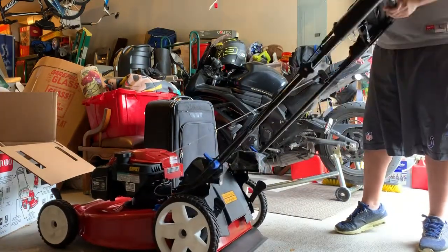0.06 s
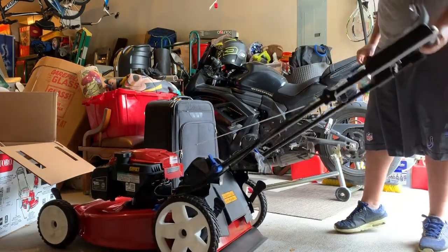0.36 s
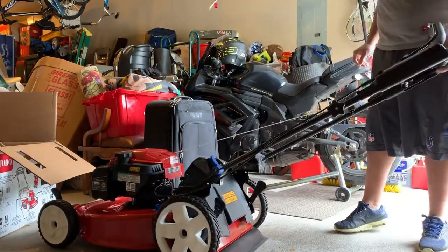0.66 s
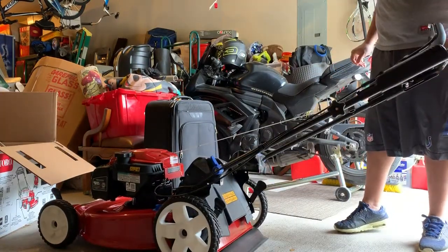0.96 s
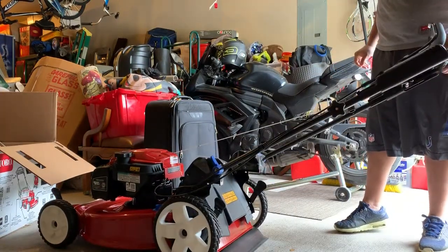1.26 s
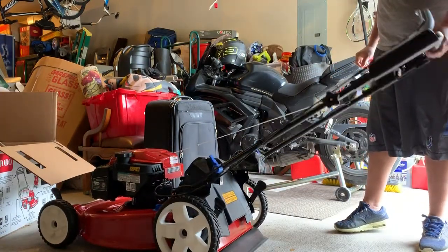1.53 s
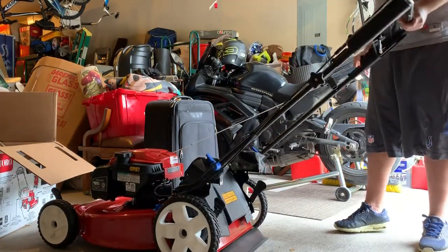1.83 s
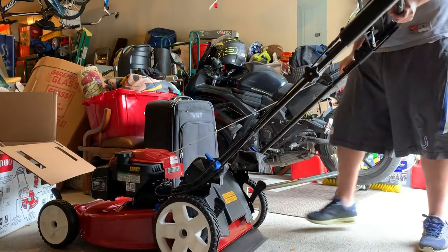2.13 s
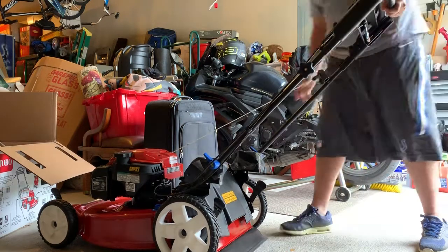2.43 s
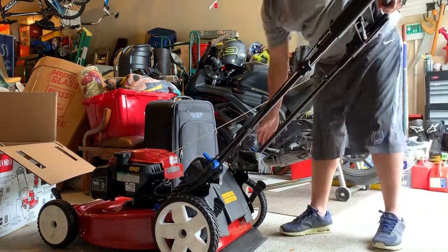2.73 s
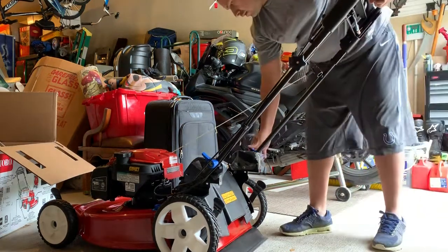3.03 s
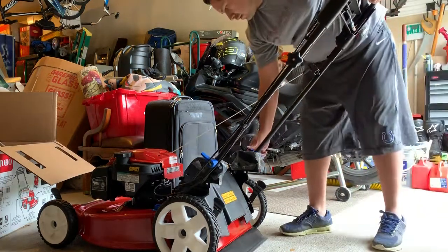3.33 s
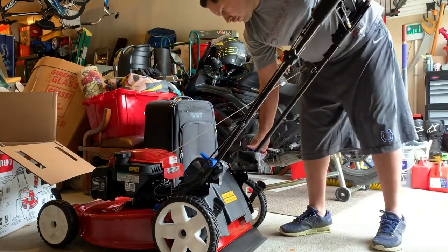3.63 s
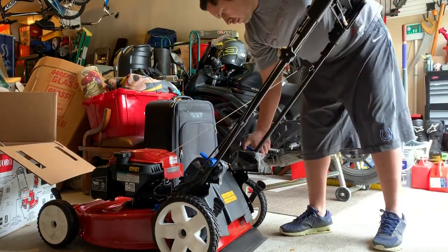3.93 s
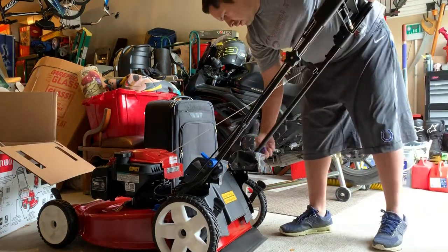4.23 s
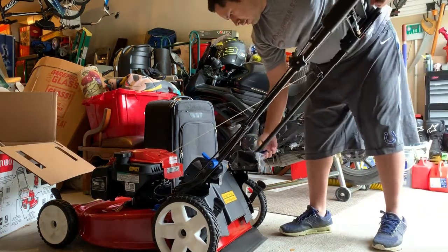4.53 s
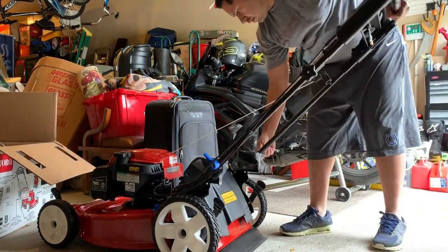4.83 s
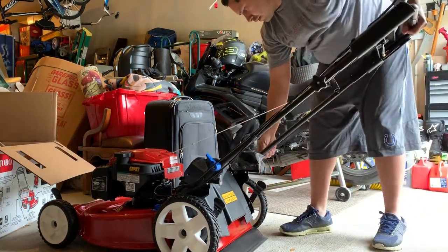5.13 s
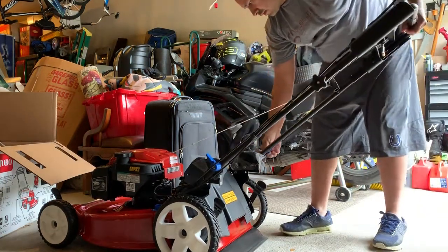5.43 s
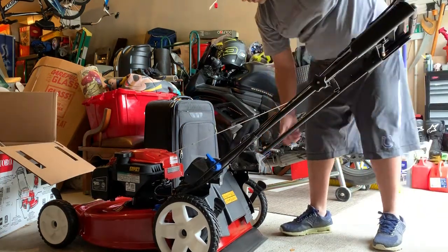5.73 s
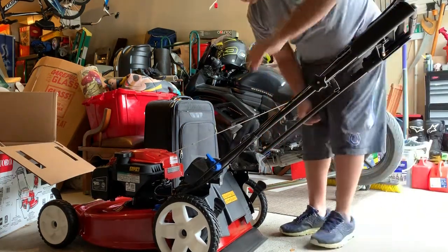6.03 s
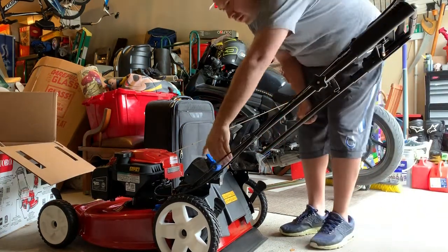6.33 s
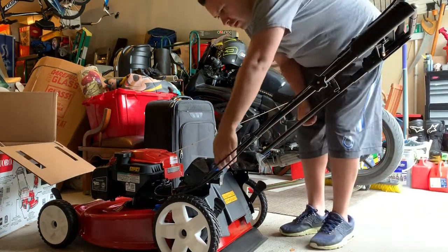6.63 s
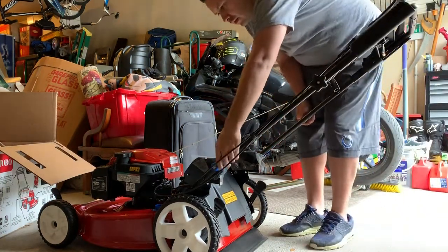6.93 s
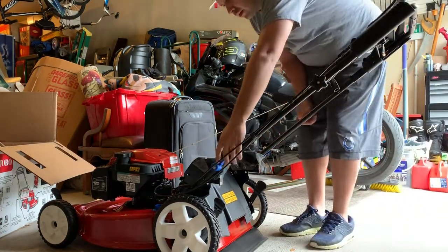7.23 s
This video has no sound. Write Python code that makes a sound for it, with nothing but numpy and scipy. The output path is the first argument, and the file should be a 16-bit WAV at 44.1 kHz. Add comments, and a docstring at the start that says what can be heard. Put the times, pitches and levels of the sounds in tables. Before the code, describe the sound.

Light clicks, rubs and knocks from a mower handle being adjusted in a garage, followed by three sharp, rattling lever snaps.

```python
"""Light ticks, scrapes and dull knocks come first: a lawn mower's folding handle is being moved.
Its joints click and rub as it is lowered and raised, clothes rustle and shoes shuffle on concrete.
Then, three times, a spring-loaded lever snaps home with a crack, rattles loose parts and sets the
deck (the mower's body) ringing. The cluttered garage echoes briefly, and a low hum fills the room."""
import sys
import numpy as np
from scipy import signal
from scipy.fft import rfft, irfft
from scipy.io import wavfile

SR = 44100
rng = np.random.default_rng(int(sys.argv[2]) if len(sys.argv) > 2 else 0)


def to_wav(sig):
    """Store sig (one row per channel, or 1-D mono) as 16-bit WAV at the path in sys.argv[1].

    Samples outside -1..1 are clipped; the rate is SR.
    """
    pcm = np.clip(np.atleast_2d(sig), -1, 1) * 32767
    pcm = np.round(pcm).astype(np.int16)
    wavfile.write(sys.argv[1], SR, pcm.T)  # frames by channels


N = 320430
SHORT, BRIEF = 32768, 6000   # samples set aside for one ring or echo, and for one contact
AGE, TIME = np.arange(SHORT) / SR, np.arange(N) / SR   # seconds into one sound, and into the scene

# Levels are relative: the functions add their own gains. Ring time is how long a 60 dB fade takes.
# the low hum swells and sinks (time [s], level [dB])
HUM_LEVELS = [(0.0, -75), (0.16, -61), (1.68, -52), (2.04, -63.5), (2.47, -56), (2.51, -61.5), (3.07, -51),
              (3.45, -58), (4.31, -47.5), (5.37, -50.5), (5.45, -55), (6.56, -48.5), (6.68, -54.5),
              (7.2, -46)]
# tone of the rumble around the hum (frequency [Hz], level [dB])
RUMBLE_TONE = [(20, -12), (40, -2), (75, -1), (120, -7.5), (250, -24), (1000, -60)]
# tone of the still air (frequency [Hz], level [dB])
AIR_TONE = [(20, -2.5), (60, -2.5), (120, -8), (220, -23), (600, -27.5), (2000, -40.5), (4200, -39),
            (6000, -53.5), (8400, -36.5), (12000, -42), (16000, -56.5)]
# how long the garage echoes (frequency [Hz], ring time [s])
ECHO_TIMES = [(100, 0.85), (350, 0.39), (1000, 0.46), (2500, 0.45), (5000, 0.41), (8000, 0.29),
              (16000, 0.05)]
# how alike the two ears hear a sound (frequency [Hz], likeness [1 = same, 0 = unrelated])
EAR_LIKENESS = [(60, 0.9), (300, 0.98), (640, 0.81), (1400, 0.11), (3000, .1), (7000, -0.0042),
                (15000, 0.077)]
# the work moves from the grip to the deck (time [s], left ear delay [ms])
EAR_DELAYS = [(0, 0.26), (3.4, 0.23), (4, -0.04), (7.27, -0.087)]
# narrow treble dips made by the microphone's openings (frequency [Hz], width [Hz], level [dB])
MIC_NOTCHES = [(9710, 2300, -24), (13110, 1700, -19.5), (16000, 1500, -9)]

# clothes and hands slide as the body moves (time [s], length [s], level [dB])
BODY_MOVES = [(0, 0.11, -59.5), (0.359, 0.24, -57), (1.576, 0.78, -64.5), (2.397, 0.44, -59),
              (2.797, 0.35, -67), (3.738, 0.92, -72.5), (5.374, 0.59, -73.5), (5.812, 0.51, -63.5),
              (6.069, 0.75, -61.5), (6.96, 0.11, -55)]
# tone of rustling cloth (frequency [Hz], level [dB])
CLOTH_TONE = [(150, 7), (400, 3.5), (800, 0), (1500, 2.5), (2500, -3), (4500, -3.5), (7000, -13.5),
              (12000, -10), (16000, -20.5)]
# shoes tread on concrete (time [s], length [s], level [dB])
FOOTSTEPS = [(0.237, 0.013, -24.5), (1.496, 0.2, -25), (2.039, .05, -33), (2.341, 0.018, -21),
             (2.754, 0.011, -23), (3.098, 0.046, -27.5), (3.785, .04, -31.5)]
# a rubber sole turns (time [s], length [s], level [dB], pitch [Hz])
SOLE_SQUEAKS = [(2.387, 0.053, -21.5, 1600), (2.415, 0.012, -24.5, 1540), (2.424, 0.0094, -23.5, 1980)]
# pivots, pins and soles rub (time [s], length [s], level [dB], middle frequency [Hz])
RUBS = [(0.221, 0.091, -27.5, 2300), (.375, 0.026, -15.5, 3320), (0.424, 0.019, -22, 2000),
        (0.514, 0.011, -17.5, 1050), (0.551, 0.077, -23, 6060), (0.67, 0.011, -16.5, 2480),
        (1.588, 0.072, -31, 2200), (1.728, 0.057, -13.5, 5050), (2.03, 0.082, -32, 1890),
        (2.25, 0.049, -20.5, 2920), (2.414, .023, -19, 1430), (2.753, 0.035, -17.5, 1950),
        (3.783, 0.032, -37.5, 1381), (3.935, 0.12, -40, 3290), (4.985, 0.054, -23, 1980),
        (5.854, 0.077, -23, 2720), (7.013, 0.018, -14.5, 1855)]
# the frame knocks on its wheels, or thumps as a lever is pulled (time [s], length [s], level [dB], rough pitch
# [Hz])
FRAME_KNOCKS = [(.076, 0.18, -30, 373), (0.424, 0.034, -23.5, 400), (0.515, 0.059, -19, 516),
                (0.554, 0.089, -8, 353), (.608, 0.033, -20, 450), (3.348, 0.021, -21.5, 510),
                (4.089, 0.048, -27, 262), (4.627, 0.21, -20, 366), (5.127, 0.012, -8, 563),
                (5.327, 0.11, -24.5, 437), (6.094, 0.016, -21.5, 342), (6.52, 0.13, -21.5, 261.6),
                (7.019, 0.04, -14.5, 430)]
# the tight cable hits the handle (time [s], level [dB], pitch [Hz], base width [Hz])
CABLE_FLICKS = [(1.0083, -14, 4920, 1760), (1.015, -21, 5100, 1970)]
# the joints click, harder contacts more brightly (time [s], level [dB], extra treble [dB])
JOINT_TICKS = [(.0135, -41, 17), (0.1653, -70, 22), (.3255, -48.5, 22), (.381, -48, 9), (.4858, -49, 26),
               (.5195, -44.5, -16), (.5626, -46, 30), (.6735, -42.5, -30), (.9168, -56, -3),
               (1.0085, -49.5, 17), (1.5484, -63, 27.5), (1.6562, -61.5, 31), (1.7144, -54.5, 23),
               (1.7395, -51, 13), (1.7724, -43.5, 19.5), (1.9016, -65.5, 21), (2.096, -63.5, 15),
               (2.2555, -46.5, 3), (2.2993, -49, 10), (2.4205, -42.5, -5), (2.506, -43.5, 12),
               (2.688, -51, 6), (2.753, -41.5, 9), (3.4645, -43, 4), (3.8205, -68.5, 24),
               (4.0913, -47, 22.5), (4.6268, -51.5, 1), (4.761, -49.5, 13), (6.571, -47, 8),
               (7.019, -36, 1.5)]
# tones that the hollow handle and plastic knobs boost (frequency [Hz], width [Hz], level [dB])
HANDLE_TONES = [(650, 28, -8.5), (880, 380, -3.5), (1340, 270, -1.5), (1628, 190, -1), (1950, 760, -1),
                (2500, 600, -2), (2998, 180, -6.5), (3913, 550, -3), (4440, 190, -7.5), (8360, 730, -6),
                (11100, 420, -12), (12700, 240, -6.5)]

# notes of the steel tubes (frequency [Hz], level [dB], ring time before any limit [s])
TUBE_NOTES = [(1410, -3.5, 0.98), (1606, -1.5, .7), (2078, 2, 0.64), (2600, 2, 0.76), (2830, -2, 0.93),
              (2862, -7.5, 0.97), (3400, -3, 0.77), (4140, 1, .9), (4406, -5.5, .8)]
# notes of the deck and frame (frequency [Hz], level [dB], ring time before any limit [s])
DECK_NOTES = [(205, -3.5, 0.21), (242.7, -0.5, 0.37), (296, 3, .33), (322, 1.5, 0.15), (350.7, 1, 0.52),
              (398.5, -8, 0.6), (435, -13.5, 0.3), (560.6, -5.5, 0.55), (604.5, -3, 0.34),
              (698, -5.5, 0.33), (769, -8, 0.19), (810, -12.5, 0.45), (1380, -20, 0.095),
              (1570, -16.5, 0.22), (1730, -12, 0.22), (2340, -8, .28), (2360, -12, 0.24),
              (2440, -6.5, 0.14), (2756, -11, 0.18), (3214, -12, 0.18), (3699, -23, 0.35),
              (4000, -18, 0.22), (4770, -23, 0.15)]
# the deck's thump, one list per snap (frequency [Hz], level [dB], ring time before any limit [s])
THUMP_NOTES = [
    [(244.1, -8, 0.36), (352.3, 2, 0.24), (637, -3.5, 0.34), (763, -10.5, 0.18)],
    [(277, -5.5, 0.17), (760, -18.5, 0.55)],
    [(201, 3, 0.14), (374, 3.5, 0.28)],
]
# a lever is pulled and its pin springs out (time [s], click level [dB], ping level [dB])
LEVER_PULLS = [(3.3483, -36, -17.5), (4.078, -34.5, -26.5), (6.0914, -32.5, -10)]
# notes of that pin (frequency [Hz], level [dB], ring time [s])
PIN_NOTES = [(2041, -2.5, 0.034), (2100, -0.5, 0.025), (3720, -13, .02), (4850, -8.5, .012),
             (8300, -8.5, .012), (12100, -4, .012)]
# a lever snaps home (time [s], crack [dB], deck [dB], lever [dB], rattle [dB], thump [dB])
LEVER_SNAPS = [(4.243, 14, -2, 4.5, 2, -3.5), (5.0662, -6.5, -8, 0.5, -10, -11.5),
               (6.627, 12.5, -8, 9.5, 0, -5)]
# tone of the crack (frequency [Hz], level [dB])
CRACK_TONE = [(150, -22.5), (400, -5), (800, -8.5), (1100, -29), (1550, 4), (2300, 1.5), (3200, -2.5),
              (4500, -4.5), (6000, -6), (8000, -0.5), (11500, -3.5), (16000, -18)]
# tone of the rattling parts (frequency [Hz], level [dB])
RATTLE_TONE = [(80, -22.5), (160, -12), (230, -2.5), (400, 4.5), (600, -4.5), (800, -4), (1100, -7),
               (1600, -8.5), (2700, -7.5), (5000, -11.5), (8000, -21), (16000, -34.5)]
# ring of lever, pin and bracket, one list per snap (frequency [Hz], base width [Hz], level [dB])
LEVER_NOTES = [
    [(1713, 43, -5), (1930, 200, -0.5), (2110, 110, -0.5), (2925, 220, -9), (3020, 120, -2.5),
     (4067, 320, 0), (5170, 250, -12), (8500, 450, -8.5)],
    [(1594, 150, -11.5), (1950, 190, 4.5), (2300, 420, -0.5), (2690, 240, -1.5), (4100, 580, -0.5),
     (5540, 270, -8), (9400, 730, 1.5), (10700, 1400, 3)],
    [(845, 70, -13), (1390, 30, -5.5), (1586, 200, -1.5), (1940, 190, -11), (2430, 170, 1.5),
     (3520, 150, -5), (4830, 730, -2.5), (7640, 3600, -32.5)],
]


def from_db(db):
    """Turn decibels into a number to multiply by."""
    return 10 ** (np.asarray(db) / 20)


def unit(x):
    """Scale a sound so its channels have an average energy of one."""
    return x / np.sqrt(np.mean(np.sum(x ** 2, axis=-1)) + 1e-20)


def at_hz(points, hz):
    """Read between the rows of a frequency table, giving each octave equal room."""
    known_hz, value = np.transpose(points)
    return np.interp(np.log(np.maximum(hz, 1)), np.log(known_hz), value)


def add(out, s, sound):
    """Mix a stereo sound in, starting at s seconds."""
    start = max(round(s * SR), 0)
    out[:, start:start + sound.shape[-1]] += sound[..., :N - start]


def band(x, low_hz, high_hz):
    """Keep mainly the sound between two frequencies."""
    return signal.sosfilt(signal.butter(2, [low_hz, high_hz], "band", fs=SR, output="sos"), x + 1e-18)


def resonate(x, hz, width_hz):
    """Pick out one pitch; the narrower the width, the longer it rings."""
    r = np.exp(-np.pi * width_hz / SR)
    feedback = [1, -2 * r * np.cos(2 * np.pi * hz / SR), r * r]
    return signal.lfilter(np.array([1, 0, -1]) * (1 - r * r) / 2, feedback, x + 1e-18)


def colour(x, tone):
    """Give a short sound a tone without smearing it back in time (a minimum-phase filter)."""
    gains = from_db(at_hz(tone, np.fft.rfftfreq(SHORT, 1 / SR)))
    cepstrum = irfft(np.log(gains))
    response = np.exp(rfft(2 * cepstrum[:SHORT // 2], SHORT))
    return irfft(rfft(x, SHORT) * response)


def trail(kicks, decay_s):
    """Give each sudden kick a fading tail."""
    return signal.lfilter([1], [1, -np.exp(-1 / (decay_s * SR))], kicks + 1e-18)


def wander(per_s):
    """Drift at random around zero, taking a new course per_s times a second."""
    points = rng.standard_normal(2000)
    return np.interp(TIME * per_s, np.arange(len(points)), points)


def diffuse(size, tone=((1, 0), (2, 0))):
    """Noise from all sides: alike in both ears in the bass, unrelated in the treble."""
    hz = np.fft.rfftfreq(size, 1 / SR)
    alike = at_hz(EAR_LIKENESS, hz)
    mid, side = rfft(rng.standard_normal((2, size))) * from_db(at_hz(tone, hz))
    ears = np.sqrt(1 + alike) * mid + np.sqrt(1 - alike) * side * [[1], [-1]]
    return unit(irfft(ears, size)) * np.sqrt(size)


def contact(s, decay_s, scatter=1.0):
    """A burst of tiny impacts reaches one ear first; nearby parts scatter the rest."""
    age = AGE[:BRIEF]
    fade = np.exp(-age / decay_s) * (1 - np.exp(-age / 0.0015))
    direct = rng.standard_normal(BRIEF) * fade
    lag_s = np.interp(s, *np.transpose(EAR_DELAYS)) / 1000
    ears = [np.interp(age - delay, age, direct, left=0) for delay in (max(lag_s, 0), max(-lag_s, 0))]
    return unit(np.array(ears)) + scatter * unit(diffuse(BRIEF) * fade)


def friction(length_s, slips_per_s, spread_db, swell=0.13):
    """Two surfaces stick and slip in uneven jerks, making a grainy noise that swells and fades."""
    size = 2 * BRIEF
    slips = rng.random(size) < slips_per_s / SR
    strength = from_db(spread_db * np.clip(rng.standard_normal(size), -2, 2))
    grains = trail(slips * strength, decay_s=0.00077) + 0.12
    progress = AGE[:size] / length_s
    return diffuse(size) * grains * progress ** swell * np.exp(-np.minimum(progress ** 2, 20))


def hollow(x):
    """The hollow handle colours whatever touches it, differently at each spot."""
    spot_db = np.clip(3.5 * rng.standard_normal(len(HANDLE_TONES)), -6, 6)
    return 0.5 * x + sum(from_db(db + extra_db) * resonate(x, hz, width_hz)
                         for (hz, width_hz, db), extra_db in zip(HANDLE_TONES, spot_db))


def ring(notes, swell_s, spread_db, longest_s=np.inf):
    """A struck part rings with several fading notes; each blow mixes them differently."""
    hz, db, ring_s = np.transpose(notes)[:, :, None]
    gain = from_db(db + spread_db * rng.standard_normal(hz.shape))
    fade = gain * from_db(-60 * AGE / np.minimum(ring_s, longest_s))
    phase = 2 * np.pi * hz * AGE + rng.uniform(-np.pi, np.pi, hz.shape)
    ear_shift = rng.choice([-1, 1], hz.shape) * np.arccos(at_hz(EAR_LIKENESS, hz)) / 2
    ears = np.array([np.sum(fade * np.sin(phase + side * ear_shift), axis=0) for side in (1, -1)])
    return unit(ears * (1 - np.exp(-AGE / swell_s)))


def background():
    """A low wavering hum and a rumble swell together over the faint noise of still air."""
    pitch_hz = 55 + wander(per_s=11)
    level_db = np.interp(TIME, *np.transpose(HUM_LEVELS)) - 0.1 * wander(per_s=9)
    balance = from_db([[-0.45], [0.45]])   # a little louder on the right
    hum = np.sqrt(2) * np.sin(2 * np.pi * np.cumsum(pitch_hz) / SR) * balance
    rumble = from_db(-10.5) * diffuse(N, RUMBLE_TONE)
    air = from_db(-61) * diffuse(N, AIR_TONE)
    return from_db(level_db) * (hum + rumble) + air


def garage(x, early_db, tail_db):
    """Clutter throws back quick echoes, then a tail that dies sooner in the treble."""
    hz, _, slices = signal.stft(diffuse(SHORT), SR, nperseg=256)
    age = np.linspace(0, AGE[-1], slices.shape[-1])
    fade = from_db(-60 * age / at_hz(ECHO_TIMES, hz)[:, None])
    tail = signal.istft(slices * fade, SR)[1][:, :SHORT]
    tail = unit(tail * (1 - np.exp(-AGE / 0.0046)))
    early = unit(diffuse(SHORT) * AGE * np.exp(-AGE / 0.0036))
    return signal.fftconvolve(x, from_db(early_db) * early + from_db(tail_db) * tail, axes=1)[:, :N]


def clothes():
    """Sliding cloth rustles and crinkles as each movement swells, holds and dies away."""
    rise_s, fall_s = 0.01, 0.065
    effort = 0
    for s, length_s, db in BODY_MOVES:
        age = np.maximum(TIME - s, 0)
        fade = np.exp(-np.maximum(age - length_s, 0) / fall_s)
        effort += from_db(db) * (1 - np.exp(-age / rise_s)) * fade
    crinkles = trail(rng.random(N) < 17 / SR, decay_s=0.01)   # about 17 a second
    folds = from_db(1.8 * wander(per_s=50) - 2)
    return diffuse(N, CLOTH_TONE) * effort * (folds + from_db(-1) * crinkles)


def thuds():
    """The frame knocks on its wheels or thumps as levers are pulled, and shoes tread on concrete: dull bursts
    of low noise."""
    out, step_hz = np.zeros((2, N)), 277
    for s, length_s, db, hz in FRAME_KNOCKS + [(*step, step_hz) for step in FOOTSTEPS]:
        burst = friction(length_s, slips_per_s=250, spread_db=1)
        add(out, s, from_db(db) * unit(band(burst, hz / 3.1, hz * 1.536)))
    return out


def squeaks():
    """A turning rubber sole slips rapidly and squeaks around one pitch."""
    out = np.zeros((2, N))
    for s, length_s, db, hz in SOLE_SQUEAKS:
        rub = friction(length_s, slips_per_s=890, spread_db=7)
        add(out, s, from_db(db) * unit(resonate(resonate(rub, hz, width_hz=300), hz, width_hz=700)))
    return out


def scrapes():
    """Pivots, pins and soles rub grittily; longer scrapes swell more gently."""
    out, reach = np.zeros((2, N)), 2 ** 1.1   # 1.1 octaves either side
    for s, length_s, db, hz in RUBS:
        rub = hollow(friction(length_s, slips_per_s=330, spread_db=3.5, swell=4.3 * length_s))
        add(out, s, from_db(db) * unit(band(rub, hz / reach, hz * reach)))
    return out


def cable():
    """The tight cable flicks against the handle with a tiny bright ping."""
    out = np.zeros((2, N))
    for s, db, hz, width_hz in CABLE_FLICKS:
        flick = resonate(contact(s, decay_s=0.00096), hz, width_hz)
        add(out, s, from_db(db) * unit(resonate(flick, hz, 2 * width_hz)))
    return out


def ticks():
    """Joints and pulled levers click, most briefly in the treble, and faintly ring the tubes."""
    out, pull_treble_db = np.zeros((2, N)), 13.5
    for s, db, treble_db in JOINT_TICKS + [(s, db, pull_treble_db) for s, db, _ in LEVER_PULLS]:
        treble = hollow(band(contact(s, decay_s=0.00092), 8000, 15500))
        middle = hollow(band(contact(s, decay_s=0.01), 1400, 11000))
        bass = hollow(band(contact(s, decay_s=0.011, scatter=0.93), 420, 900))
        add(out, s, from_db(db + 12 + treble_db) * unit(treble))
        add(out, s, from_db(db + 19) * unit(middle))
        add(out, s, from_db(db + 10.5 - 0.31 * treble_db) * unit(bass))   # brighter means less bass
        add(out, s, from_db(db + 2) * ring(TUBE_NOTES, swell_s=0.002, spread_db=5.5, longest_s=0.45))
    return out


def deck_and_tubes():
    """Snaps thump the deck and set the tubes singing; knocks ring the deck more softly."""
    out = np.zeros((2, N))
    hard_blows = [(s, deck_db) for s, _, deck_db, *_ in LEVER_SNAPS]
    soft_blows = [(s, db - 11.5) for s, _, db, _ in FRAME_KNOCKS]
    for s, db in hard_blows + soft_blows:
        add(out, s, from_db(db + 9.5) * ring(DECK_NOTES, swell_s=0.0016, spread_db=1, longest_s=0.5))
    for (s, _, deck_db, _, _, thump_db), notes in zip(LEVER_SNAPS, THUMP_NOTES):
        thump = ring(notes, swell_s=0.007, spread_db=2, longest_s=0.5)
        tubes = ring(TUBE_NOTES, swell_s=0.004, spread_db=6, longest_s=0.96)
        add(out, s, from_db(thump_db + 9) * thump + from_db(deck_db - 14.5) * tubes)
    return out


def rattle():
    """Loose parts chatter after a blow: a quick run of uneven bounces, dying away."""
    bounces = rng.random(SHORT) < 450 / SR   # about 450 a second
    strength = from_db(3.5 * np.clip(rng.standard_normal(SHORT), -2, 1.5))
    chatter = trail(bounces * strength, decay_s=0.002) + 0.5
    fade = np.exp(-AGE / 0.038) * (1 - np.exp(-AGE / 0.006))
    return unit(colour(diffuse(SHORT) * chatter * fade, RATTLE_TONE))


def levers():
    """A spring slams a pin into its hole: a crack, a short ring, a rattle. Pulled out, it pings."""
    out = np.zeros((2, N))
    for (s, crack_db, _, lever_db, rattle_db, _), notes in zip(LEVER_SNAPS, LEVER_NOTES):
        blow = contact(s, decay_s=0.0055, scatter=0.96)
        add(out, s, from_db(crack_db) * unit(colour(blow, CRACK_TONE)))
        for hz, width_hz, db in notes:
            note = resonate(resonate(blow, hz, 1.5 * width_hz), hz, 3 * width_hz)
            add(out, s, from_db(lever_db + db - 6) * unit(note))
        add(out, s, from_db(rattle_db + 7.5) * rattle())
    for s, _, ping_db in LEVER_PULLS:
        add(out, s, from_db(ping_db) * ring(PIN_NOTES, swell_s=0.0004, spread_db=1))
    return out


def scene():
    """Mix the mower and the person moving it with the garage's echo and hum."""
    snaps = levers()
    handling = ticks() + cable() + scrapes() + squeaks() + thuds()
    ringing = deck_and_tubes()
    echo = garage(snaps + from_db(3.5) * handling + from_db(-7.5) * ringing, early_db=-9, tail_db=-7)
    return snaps + handling + ringing + echo + clothes() + background()


def record(dry):
    """The microphone notches the treble and cuts the very top; the loudest peaks are rounded off."""
    ceiling, cutoff_hz = 0.92, 16000
    for hz, width_hz, db in MIC_NOTCHES:
        dry = dry + (from_db(db) - 1) * resonate(dry, hz, width_hz)
    rounded = dry / (1 + (dry / ceiling) ** 4) ** 0.25
    return signal.sosfilt(signal.ellip(10, 0.2, 80, cutoff_hz, fs=SR, output="sos"), rounded)


dry = scene()
out = record(dry)
to_wav(out)
```